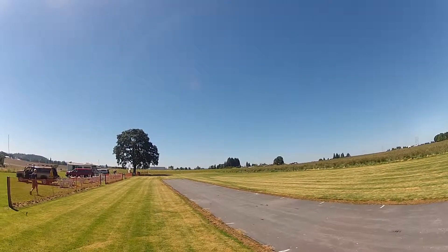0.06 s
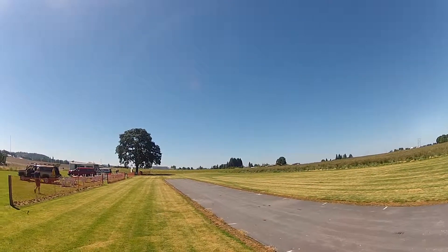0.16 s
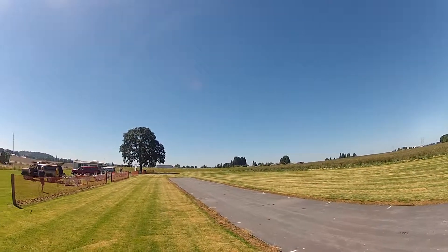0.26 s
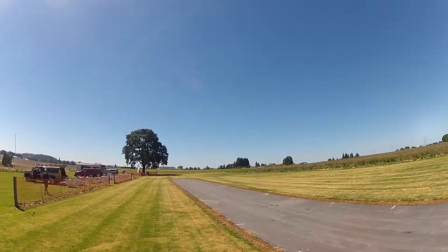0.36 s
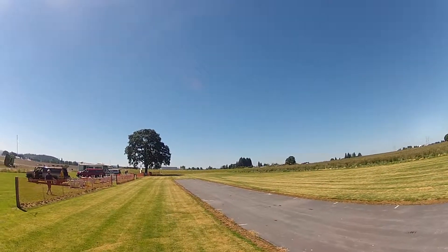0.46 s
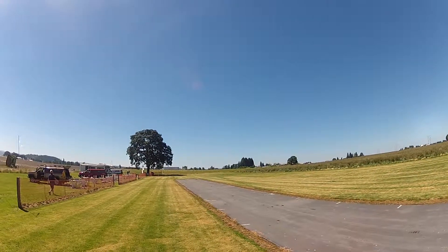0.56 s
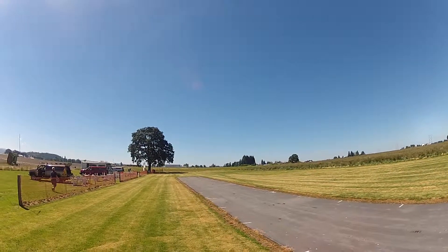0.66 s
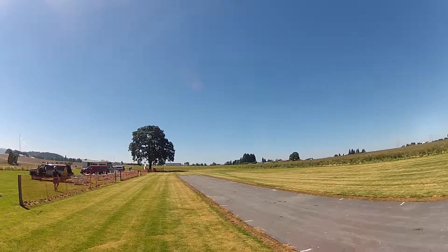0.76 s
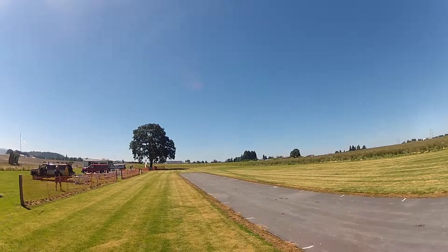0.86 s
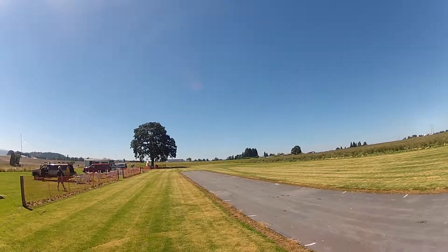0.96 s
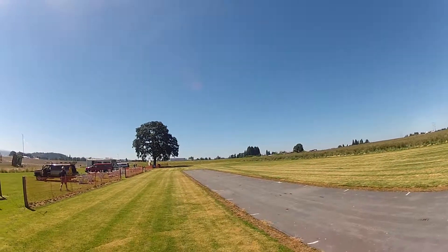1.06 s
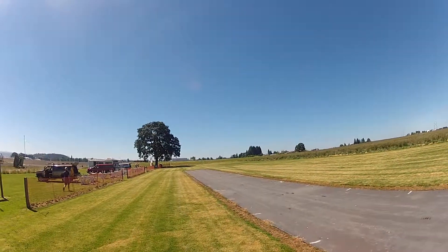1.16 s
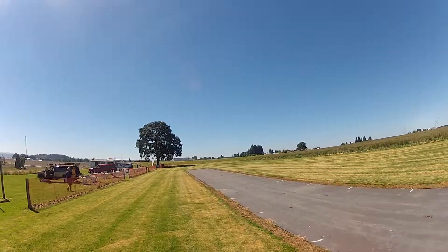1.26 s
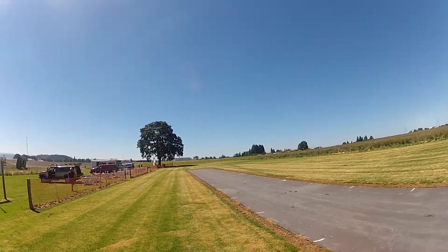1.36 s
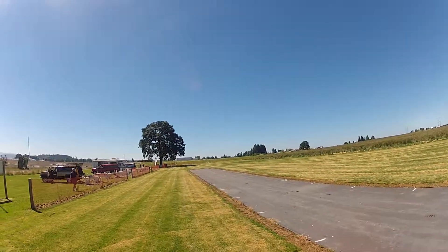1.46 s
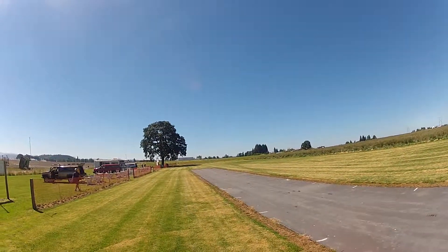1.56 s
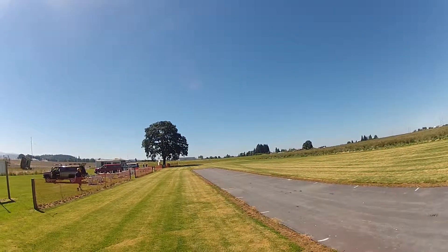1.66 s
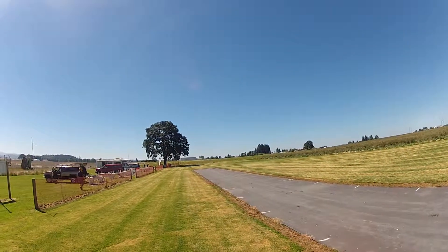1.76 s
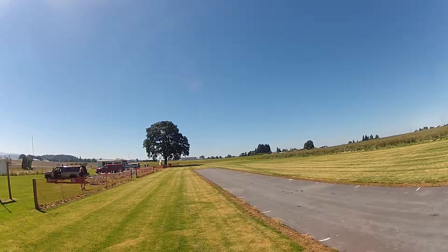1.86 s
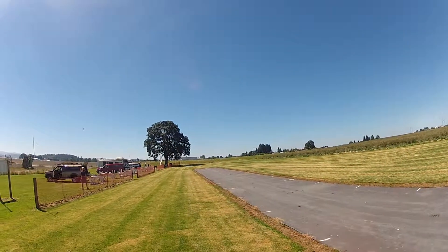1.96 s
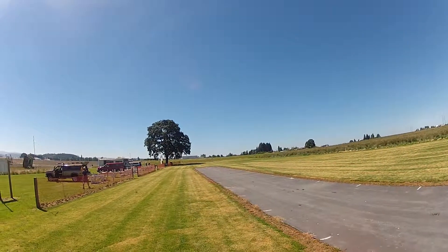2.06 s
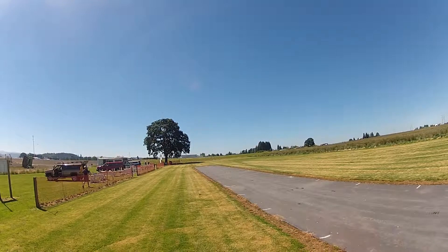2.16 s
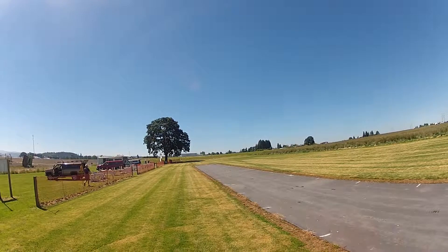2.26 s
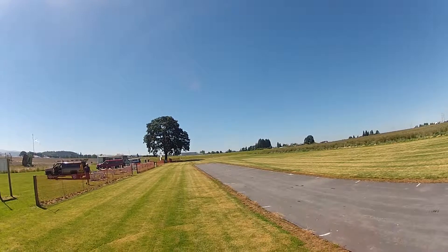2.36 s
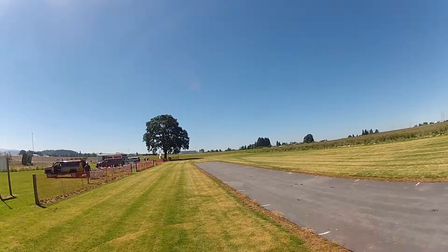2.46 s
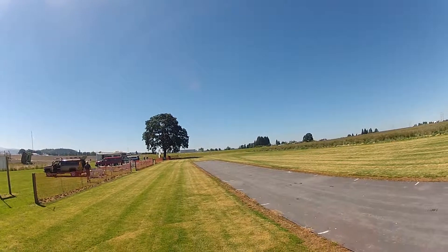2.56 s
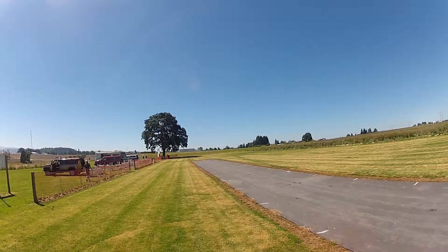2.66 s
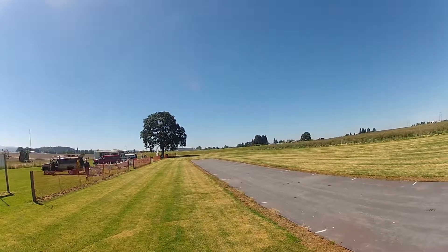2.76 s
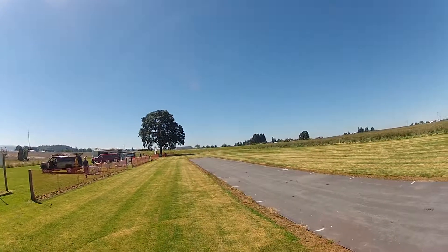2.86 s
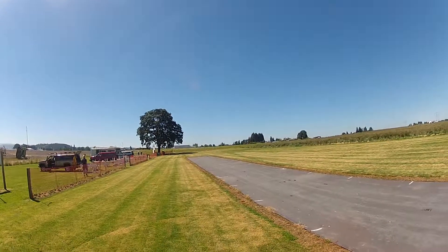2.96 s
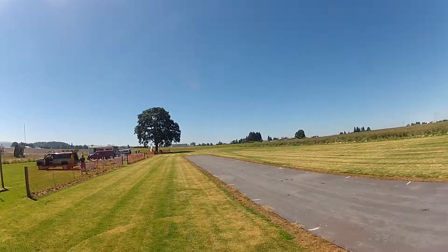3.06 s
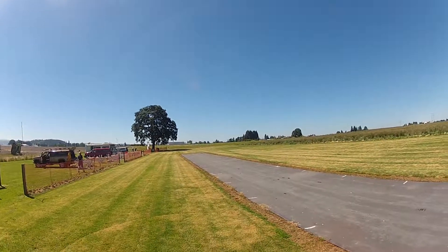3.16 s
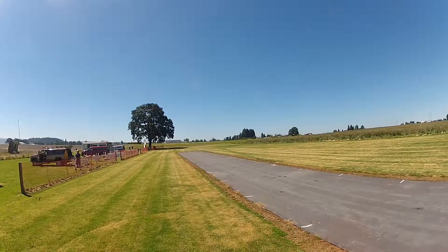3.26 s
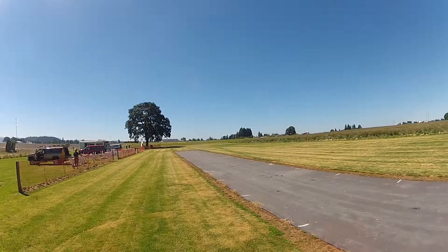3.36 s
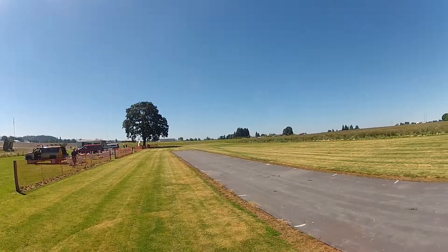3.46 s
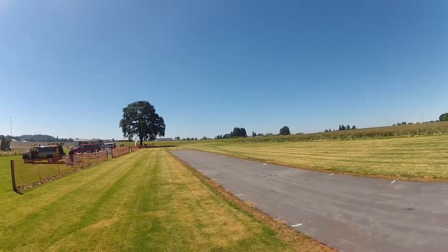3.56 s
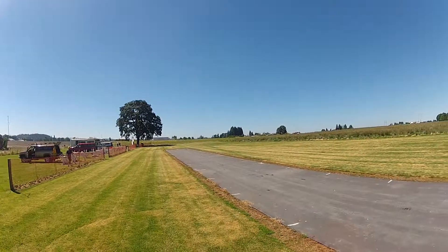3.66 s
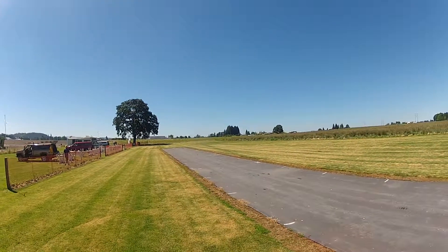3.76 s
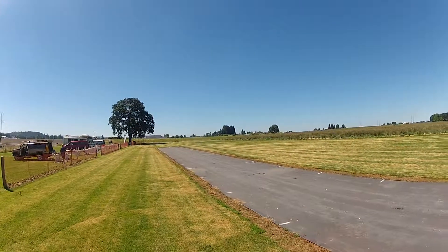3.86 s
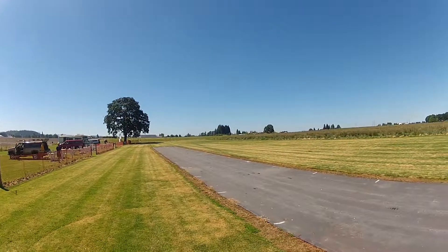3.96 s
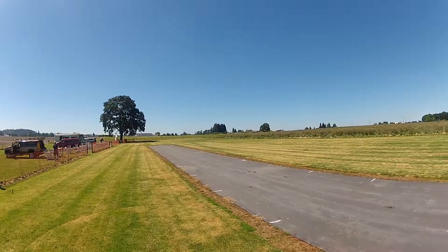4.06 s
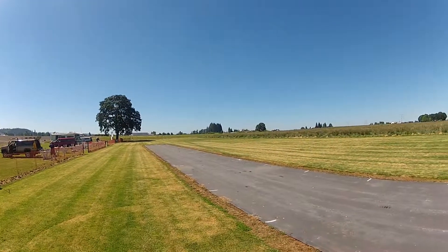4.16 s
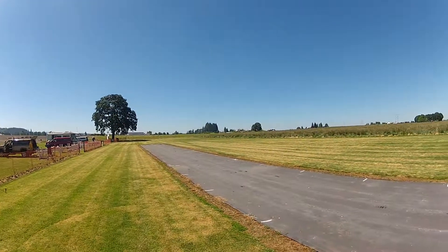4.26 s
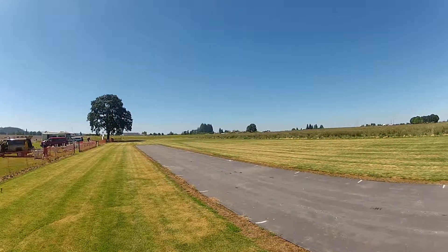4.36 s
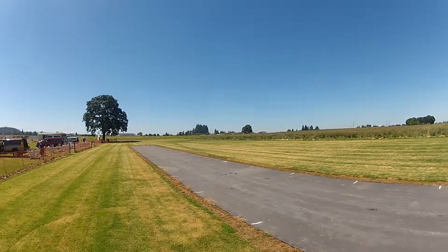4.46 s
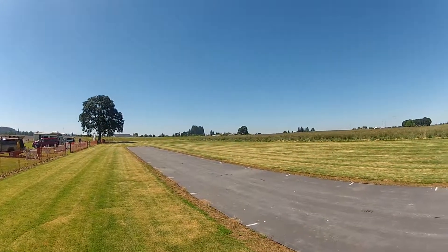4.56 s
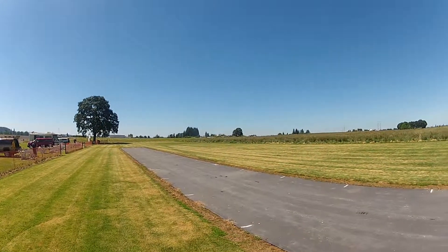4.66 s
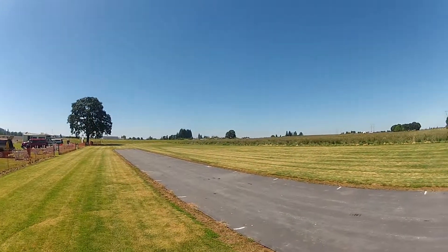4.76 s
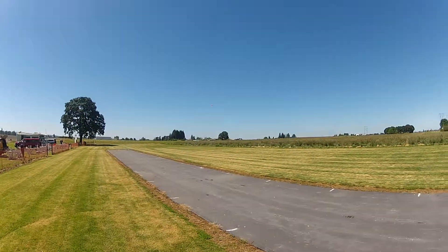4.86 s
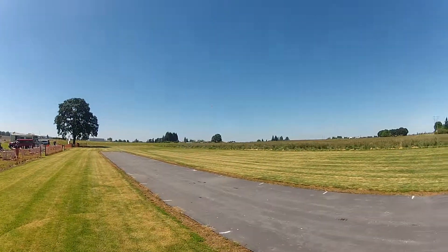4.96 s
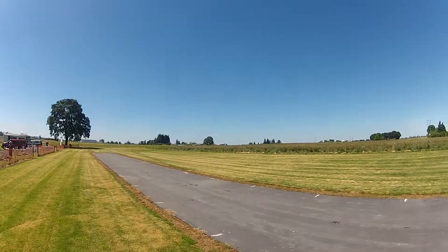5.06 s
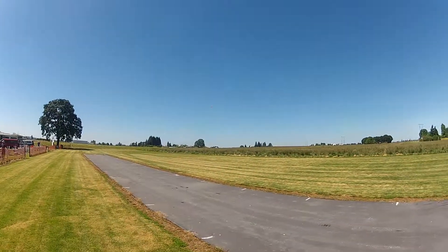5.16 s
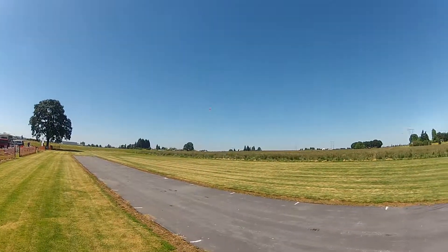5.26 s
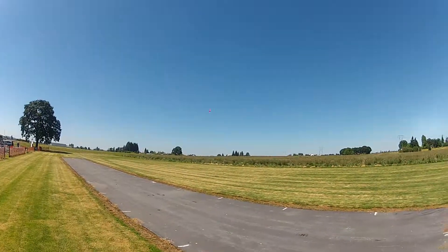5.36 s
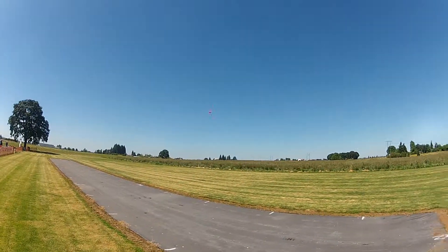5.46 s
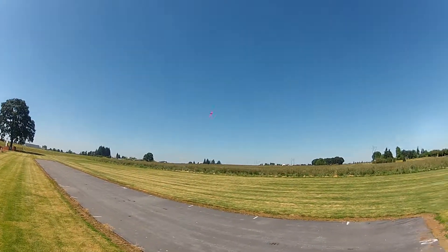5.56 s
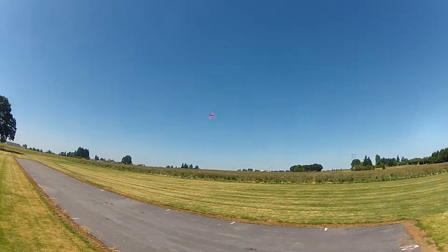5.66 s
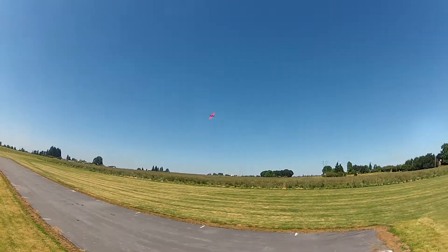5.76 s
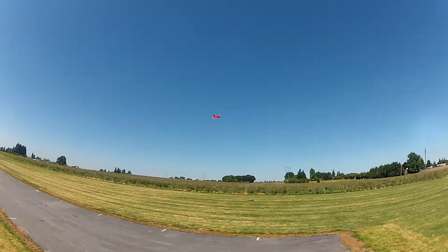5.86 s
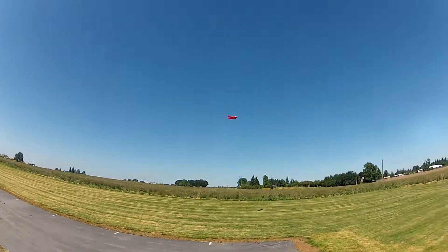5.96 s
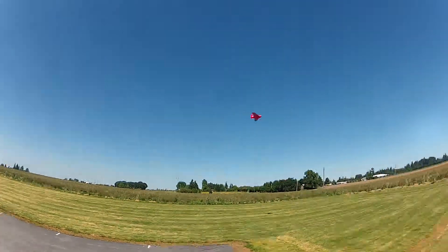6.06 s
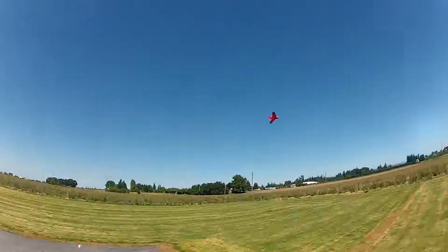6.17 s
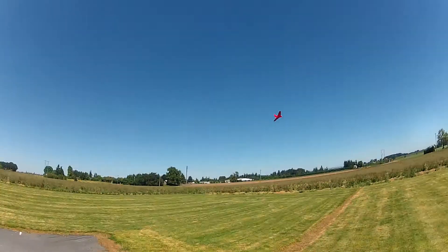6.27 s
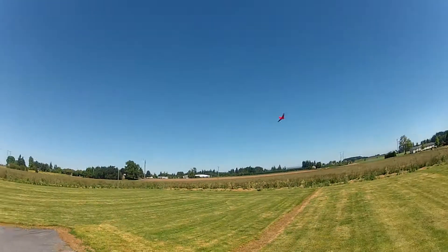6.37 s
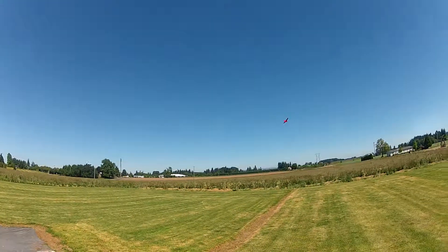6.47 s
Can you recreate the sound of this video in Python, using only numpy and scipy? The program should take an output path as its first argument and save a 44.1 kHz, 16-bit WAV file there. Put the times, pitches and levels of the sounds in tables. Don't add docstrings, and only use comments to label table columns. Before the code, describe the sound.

Outdoors on an open grass field, a small camera microphone catches low wind thumps, faint far traffic, a brief cricket chirp and light case taps. A distant electric model jet flutters in with a thin rising whine, steadies and grows with airy hiss, then sweeps past near the end, its pitch dropping as the exhaust roars and a lower tone swells.

```python
import sys
import numpy as np
from scipy import signal
from scipy.fft import rfft, irfft, next_fast_len
from scipy.io import wavfile
from scipy.ndimage import uniform_filter1d, map_coordinates

SR = 44100
rng = np.random.default_rng(int(sys.argv[2]) if len(sys.argv) > 2 else 0)


def convert_level_to_amplitude(level_db):
    exponent = np.asarray(level_db, float) / 20
    return 10 ** exponent


def put_to_file(sound):
    columns = np.atleast_2d(sound).T
    safe = np.clip(columns, -1, 1)
    whole_steps = np.round(safe * 32767)
    wavfile.write(sys.argv[1], SR, whole_steps.astype(np.int16))


N = 287532
TIME = np.arange(N) / SR
BLADES = 5


def curves(table):
    s, *columns = np.transpose(table)
    return [np.interp(TIME, s, column) for column in columns]


def bell(s, half):
    out = np.zeros(N)
    near = slice(*np.searchsorted(TIME, [s - 4 * half, s + 4 * half]))
    out[near] = np.exp(-((TIME[near] - s) / half) ** 2)
    return out


def walk(rate):
    k = int(SR / rate)
    held = np.repeat(rng.standard_normal(N // 100)[:N // k + 1], k)[:N]
    return 1.35 * uniform_filter1d(uniform_filter1d(held, k), k)


def coloured(points, flicker_db, rate):
    size = next_fast_len(N)
    hz = np.arange(1, size // 2 + 2) * SR / size
    f, db = np.transpose(points)
    outside = np.maximum(np.maximum(f[0] / hz, hz / f[-1]), 1)
    colour_db = np.interp(np.log(hz), np.log(f), db) - 30 * np.log2(outside)
    spectrum = rfft(rng.standard_normal(size)) * convert_level_to_amplitude(colour_db)
    out = 0
    for centre in np.arange(np.log2(f[0]) - 1, np.log2(f[-1]) + 1, .5):
        share = np.clip(1 - 2 * abs(np.log2(hz) - centre), 0, 1)
        out = out + irfft(spectrum * share, size)[:N] * convert_level_to_amplitude(flicker_db * walk(rate))
    return out / np.std(out)


def band(x, lo_hz, hi_hz):
    return signal.sosfilt(signal.butter(2, [lo_hz, hi_hz], "bandpass", fs=SR, output="sos"), x)


def traffic():
    # peak in seconds, drone level in dB, hum level in dB, half length in seconds
    passing = [
        (0, -60, -64, .06),
        (1.9, -56, -64.5, 0.28),
        (2.287, -66, -69, 0.17),
        (3.28, -65, -74, 0.27),
        (4.4, -60, -61.5, 0.41),
        (5.0, -74, -74, 0.34),
        (5.5, -65.5, -65, 0.22),
        (6.197, -55, -64, 0.24),
    ]
    drone = convert_level_to_amplitude(-67) + sum(convert_level_to_amplitude(db) * bell(s, half) for s, db, _, half in passing)
    hum = convert_level_to_amplitude(-64.5) + sum(convert_level_to_amplitude(db) * bell(s, half) for s, _, db, half in passing)
    low = coloured([(240, 3.5), (300, 4.0), (390, -1.0)], flicker_db=1.4, rate=10)
    high = coloured([(440, -4.5), (600, 0.0), (760, -0.5)], flicker_db=-1.3, rate=7.7)
    return drone * low + hum * high


def cricket():
    # peak in seconds, level in dB, pitch in Hz, half length in seconds
    chirps = [
        (.04, -67, 3770, .015),
        (.105, -72, 3870, .018),
        (.212, -68, 3880, .018),
    ]
    strokes = 1 + np.cos(2 * np.pi * 110 * TIME)
    return sum(convert_level_to_amplitude(db) * bell(s, half) * np.sin(2 * np.pi * hz * TIME) * strokes for s, db, hz, half in chirps)


def field():
    # frequency in Hz, level in dB per Hz
    air_colour = [(150, -32), (220, -10.5), (330, -3), (640, -4.5), (850, -21), (1300, -18), (2200, -19.5),
                  (3500, -20), (5200, -27.5)]
    air = convert_level_to_amplitude(-62.5) * coloured(air_colour, flicker_db=0.0, rate=5.97)
    return air + traffic() + cricket()


def knocks():
    # start in seconds, peak level in dB, pitch in Hz, 60 dB decay time in seconds
    taps = [
        (.006, -42.5, 610, 0.059),
        (.016, -43, 416, 0.064),
        (1.1905, -35, 567, 0.018),
        (1.196, -38, 639, 0.082),
        (1.199, -43, 476, .04),
        (1.2175, -51, 634, .025),
    ]
    out = np.zeros(N)
    for s, db, hz, t60 in taps:
        t = np.maximum(TIME - s, 0)
        ring = np.exp(-np.log(1000) * t / t60) * (1 - np.exp(-t / 0.001))
        out += convert_level_to_amplitude(db) * np.sin(2 * np.pi * hz * t) * ring
        out += convert_level_to_amplitude(db - 15) * np.sin(2 * np.pi * 2.23 * hz * t) * np.exp(-t / 0.0016)
    return out


def steady(x, span_s):
    return x / uniform_filter1d(x ** 2, int(span_s * SR)) ** 0.61


def rustle():
    # peak in seconds, level in dB, half length in seconds
    scrapes = [
        (0.35, -60.5, 0.11),
        (0.704, -65, 0.054),
        (3.253, -70, 0.028),
        (4.083, -69, .08),
    ]
    level = sum(convert_level_to_amplitude(db) * bell(s, half) for s, db, half in scrapes)
    return level * coloured([(280, 0), (550, -6), (1200, -15)], flicker_db=2.0, rate=26)


def wind():
    # peak in seconds, peak level in dB, half length in seconds, upper edge level in dB
    gusts = [(0.018, -44, 0.058, -14), (.13, -41, 0.026, -24), (0.284, -47, 0.037, 1),
             (0.37, -41, 0.094, -7), (0.685, -52.5, 0.029, -20), (.84, -54.5, 0.029, -7),
             (0.97, -49, 0.013, -16), (1.092, -56, 0.089, -22), (1.35, -45.5, 0.048, -1.5),
             (1.525, -51, 0.057, 1.5), (2.013, -47, 0.042, -22), (2.158, -45.5, 0.056, 1),
             (2.29, -48, 0.1, 1.5), (2.554, -48, 0.037, 0), (2.664, -54.5, 0.12, -7),
             (3.04, -46.5, 0.082, -4.5), (3.29, -42.5, 0.12, 0), (3.657, -41.5, 0.12, -1.5),
             (3.838, -40, 0.051, -1.5), (3.914, -38, 0.019, -2.5), (4.045, -36.5, 0.048, 4.5),
             (4.218, -38, 0.12, -7), (4.587, -52, 0.079, -12), (4.984, -49.5, 0.13, -4.5),
             (5.238, -33.5, .06, -8.5), (5.369, -35, .03, -15), (5.484, -43, 0.045, -24),
             (5.682, -49, .06, -25), (5.97, -50, 0.037, -15), (6.192, -48.5, 0.12, 3)]
    # frequency in Hz, level in dB per Hz
    wind_colour = [(45, 5), (60, 1), (90, 4.5), (125, -6), (170, -13)]
    calm_db, calm_edge_db = -52.5, -4
    gust = convert_level_to_amplitude(calm_db) + sum(convert_level_to_amplitude(db) * bell(s, half) for s, db, half, _ in gusts)
    sharp = convert_level_to_amplitude(calm_db + calm_edge_db)
    sharp = sharp + sum(convert_level_to_amplitude(db + edge_db) * bell(s, half) for s, db, half, edge_db in gusts)
    thud = convert_level_to_amplitude(-11) * uniform_filter1d(gust, int(0.36 * SR))
    slaps = convert_level_to_amplitude(1.5 * walk(30))
    low = steady(coloured(wind_colour, flicker_db=0.2, rate=7.7), 0.054)
    edge = coloured([(140, 0), (200, -3.5), (300, -18.5)], flicker_db=2.0, rate=14)
    deep = steady(coloured([(22, -6.5), (40, -7), (55, -9.5)], flicker_db=-0.5, rate=11.0), .09)
    edge = convert_level_to_amplitude(-6.0) * sharp / gust * slaps * edge
    eddies = slaps * (low + edge) + thud / gust * deep
    suction = eddies ** 2 - uniform_filter1d(eddies ** 2, 2500)
    return gust * (eddies - 0.068 * suction) + rustle()


def shaft_rate():
    # time in seconds, shaft rate as heard in Hz
    heard_hz = [(0, 695.2), (.4, 724.1), (1.2, 775.9), (1.6, 805.1), (2, 829.6), (2.4, 845.2), (2.8, 856.3),
                (3.2, 862.1), (5.4, 861.9), (5.66, 858.8), (5.78, 853.8), (5.9, 844.8), (5.99, 830),
                (6.08, 805.6), (6.27, 727.5), (6.36, 699), (6.44, 684.5), (6.52, 675.2)]
    return uniform_filter1d(curves(heard_hz)[0], size=3000, mode="nearest")


def beam(tail_and_nose_db, facing):
    tail_db, nose_db = tail_and_nose_db
    return tail_db + (nose_db - tail_db) * facing


def bounce(x, hz, periods):
    lag = periods / (BLADES * hz) * SR
    return map_coordinates(x, [np.arange(N) - lag], order=3, mode="nearest")


def shaft_tone(turn, hz, periods):
    # time in seconds, direct level in dB
    direct_db = [(0, -54), (.2, -55), (.5, -62), (1.45, -65), (2.1, -57), (2.4, -58), (2.75, -63),
                 (3.3, -66), (4, -61), (4.23, -68), (4.45, -61), (4.8, -57), (5.2, -56), (5.5, -51),
                 (6.05, -41), (6.25, -34), (6.35, -31), (6.44, -33), (6.52, -33)]
    # time in seconds, bounce strength from 0 to 1
    bounce_strength = [(0, 0.085), (4.5, 0.38), (5.8, 0.48), (6.15, 0.92), (6.52, 0.62)]
    gain = np.sqrt(2) * convert_level_to_amplitude(curves(direct_db)[0] + 0.38 * walk(16))
    reflected = bounce(gain * np.sin(turn + 2 * np.pi * .1), hz, periods)
    return gain * np.sin(turn) + curves(bounce_strength)[0] * reflected


def blade_whine(turn, hz, facing, whine_db, periods, strength):
    whine_beam = (-1.5, 6)
    # middle in seconds, depth from 0 to 1, half width in seconds
    fades = [(0.272, 0.9, 0.015), (0.389, 1, 0.025), (0.546, 0.95, 0.012), (0.675, 0.9, 0.012),
             (0.794, 1, 0.0095), (0.974, 1, 0.0099), (1.067, 0.7, 0.011), (1.156, 0.74, 0.019),
             (1.266, 1, 0.0055), (1.372, 1, 0.027), (1.455, 1, 0.033), (1.555, 0.9, 0.015),
             (2.135, 0.6, 0.025), (2.31, 0.4, 0.01), (4.009, 0.56, 0.029)]
    flutter_db = 1.0 * walk(45) + .5 * walk(250)
    level_db = whine_db + beam(whine_beam, facing) + 3.0 + flutter_db
    blades = np.sqrt(2) * np.sin(BLADES * turn) * convert_level_to_amplitude(level_db)
    for s, depth, half in fades:
        blades = blades * (1 - depth * bell(s, half))
    banked = periods - 3 * np.tanh(np.maximum(TIME - 6.15, 0) / .11)
    return blades + strength * bounce(blades, hz, banked)


def duct_noise(hz, facing, hiss_db, periods, strength):
    # frequency in Hz, level in dB per Hz, as coloured by the camera case
    hiss_colour = [(950, -11.5), (1300, -15), (1800, -10.5), (2070, 0), (2220, -0.5), (2400, 3.5),
                   (2600, -3.5), (3000, 2), (3500, -5.5), (3950, -3), (4300, -3.5), (4700, -5),
                   (5300, -2.5)]
    bright_beam = (-13, -6.5)
    side_beam = (-7, -9.5)
    abeam = bell(6.27, 0.44)
    air = coloured(hiss_colour, flicker_db=0.64, rate=12)
    bright_db = beam(bright_beam, facing) + 1.7 * walk(8)
    side_db = beam(side_beam, facing) + 2.5 * abeam + 2.5 * walk(10)
    hiss = air + (convert_level_to_amplitude(bright_db + 7.5) - 1) * band(air, 3630, 7400)
    hiss = hiss + (convert_level_to_amplitude(side_db + 11.0) - 1) * band(air, 920, 1870)
    roar = coloured([(230, -3), (500, 3.0), (750, 9.0), (1000, -9.5)], flicker_db=3.0, rate=10)
    noise = convert_level_to_amplitude(hiss_db + 2.0) * (hiss + convert_level_to_amplitude(-14.5 + 10.5 * abeam) * roar)
    turned = np.real(signal.hilbert(noise, next_fast_len(N))[:N] * np.exp(2j * np.pi * .12))
    grass = signal.lfilter(*signal.butter(1, 5000, fs=SR), bounce(turned, hz, periods))
    return noise + (0.5 + 0.26 * strength) * grass


def jet():
    # time in seconds, hiss level in dB as the jet nears
    nearness = [(0, -69.5), (.5, -74.5), (1, -65.5), (1.8, -69), (2.38, -64), (2.55, -59.5), (3.2, -60.5),
                (4.1, -57.5), (4.7, -55), (5.2, -50.5), (5.5, -47), (5.75, -44.5), (6.02, -41), (6.27, -43),
                (6.52, -44.5)]
    # middle in seconds, hiss change in dB, whine change in dB, half width in seconds
    focusing = [(.11, 4.5, 0, 0.043), (.33, 3, -9, 0.033), (.6, -1.5, 7, 0.079), (.75, 2, -4, 0.027),
                (.91, 3.5, 8, 0.038), (1.02, 2, -5, 0.015), (1.15, -6, 2, 0.053), (1.32, 6, 7.5, 0.024),
                (1.42, -3, -5, 0.053), (1.52, 2, -6, .05), (1.59, 2.5, -17, 0.036), (1.68, 6.5, 5.5, 0.035),
                (1.77, 3.5, -3.5, .04), (2.2, 1.5, 1, 0.054), (2.48, -0.5, 3.5, 0.13),
                (2.85, -0.5, 5.5, 0.15), (3.1, -1, -1, 0.049), (3.42, -3.5, -3, 0.1), (3.62, 1, 9.5, 0.15),
                (3.92, -5, -7.5, 0.096), (4.24, 4, 1.5, 0.058), (4.36, 1.5, 3.5, 0.072),
                (4.57, -0.5, -1.5, .04), (4.7, 1, -5, 0.057), (4.96, -1, -3.5, 0.062),
                (5.03, 1.5, -2, 0.061), (5.15, -1, -5, 0.088), (5.32, 0, -1.5, .06), (5.81, 0, 2.5, 0.046),
                (6.19, 0.5, -4.5, .11)]
    # time in seconds, bounce lag in blade periods, bounce strength from 0 to 1
    ground = [(0, 7.3, .2), (2.2, 8.15, .3), (2.437, 8.5, .6), (2.84, 7.5, .8), (2.98, 6.5, .12),
              (3.12, 5.5, .4), (3.27, 5, .5), (3.548, 4.5, .65), (4.27, 4, .5), (4.589, 5.47, .85),
              (5.054, 7.47, .88), (5.396, 9.48, .72), (5.65, 11.5, .3), (5.837, 13.5, .45),
              (6.15, 17.8, .6), (6.2, 17.8, .8), (6.34, 15.5, .55), (6.52, 12, .35)]
    hz = shaft_rate()
    tail_on_hz, nose_on_hz = 675, 862
    facing = np.clip((hz - tail_on_hz) / (nose_on_hz - tail_on_hz), 0, 1)
    near_db = curves(nearness)[0]
    hiss_db = near_db + sum(db * bell(s, half) for s, db, _, half in focusing)
    whine_db = near_db + sum(db * bell(s, half) for s, _, db, half in focusing)
    turn = 2 * np.pi * np.cumsum(hz) / SR + 0.048 * walk(27)
    periods, strength = curves(ground)
    tones = shaft_tone(turn, hz, periods) + blade_whine(turn, hz, facing, whine_db, periods, strength)
    return tones + duct_noise(hz, facing, hiss_db, periods, strength)


def scene():
    return (field() + knocks() + wind() + jet())[None]


def top_cut(x):
    return signal.sosfilt(signal.butter(12, 16580, fs=SR, output="sos"), x)


def record(dry):
    smooth = signal.sosfilt(signal.butter(8, 5350, fs=SR, output="sos"), dry[0])
    slow = signal.resample_poly(smooth, 40, 147, window=("kaiser", 8.))
    held = signal.resample_poly(np.repeat(slow, 4), 147, 160)[:N]
    held = np.pad(held, (0, N - len(held)))
    top = signal.ellip(12, .2, 90, 15300, fs=SR, output="sos")
    mix = signal.sosfilt(top, held)[None]
    return top_cut(mix)


dry = scene()
out = record(dry)
put_to_file(out)
```